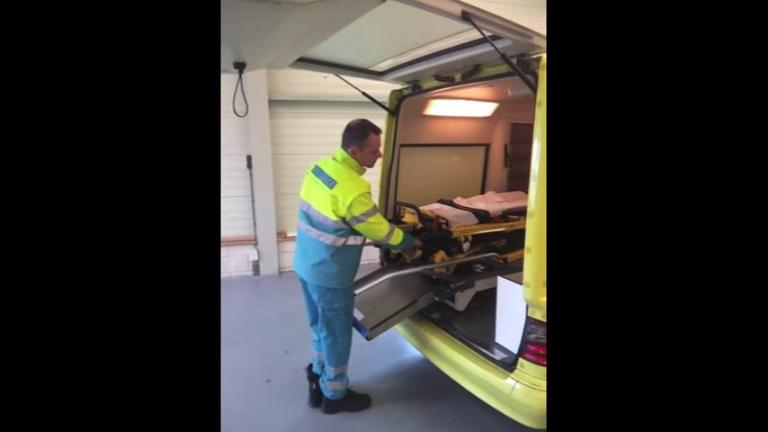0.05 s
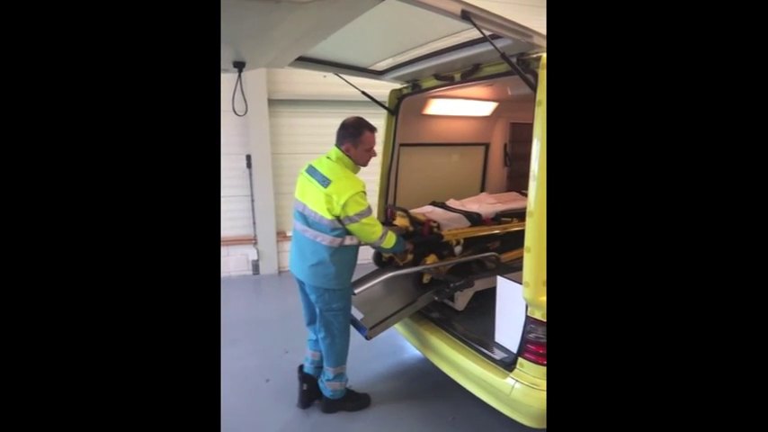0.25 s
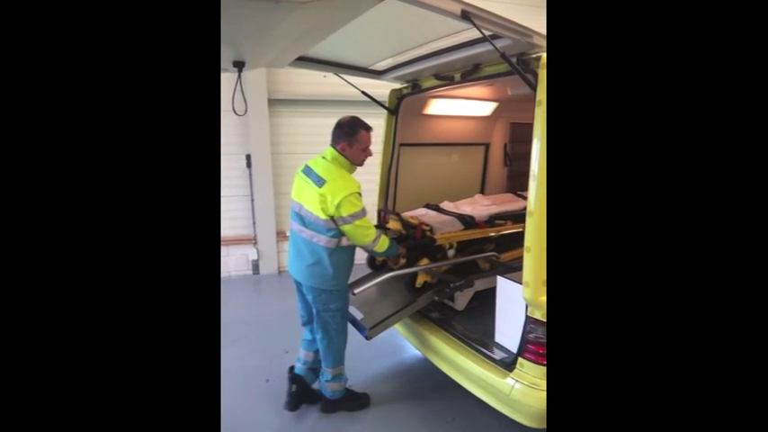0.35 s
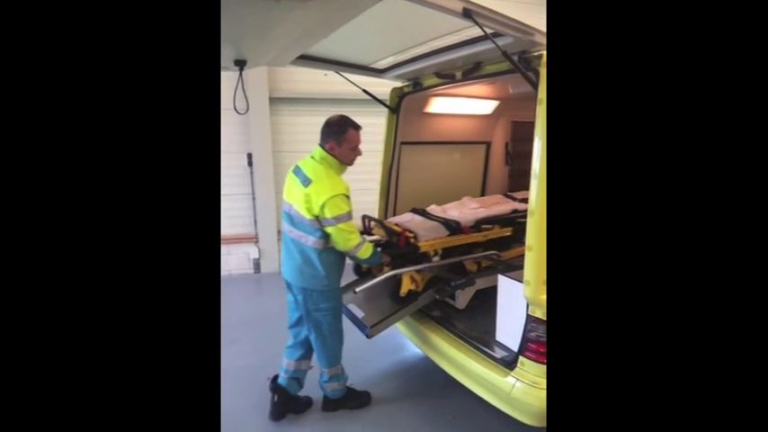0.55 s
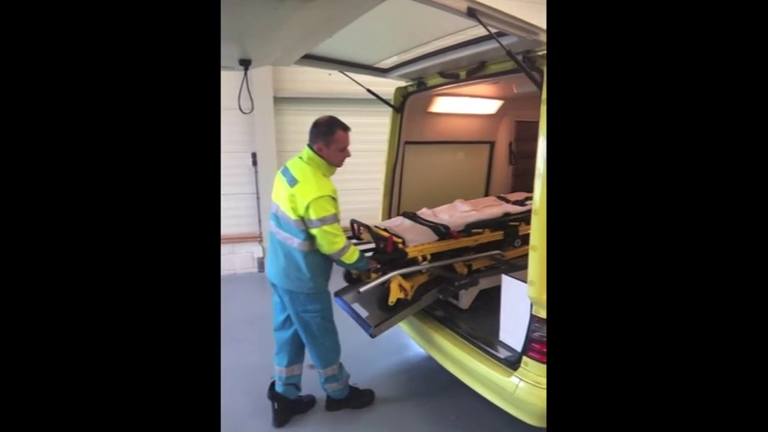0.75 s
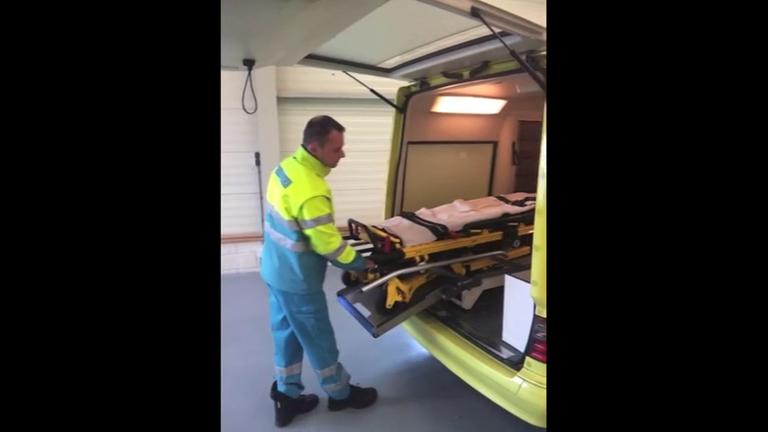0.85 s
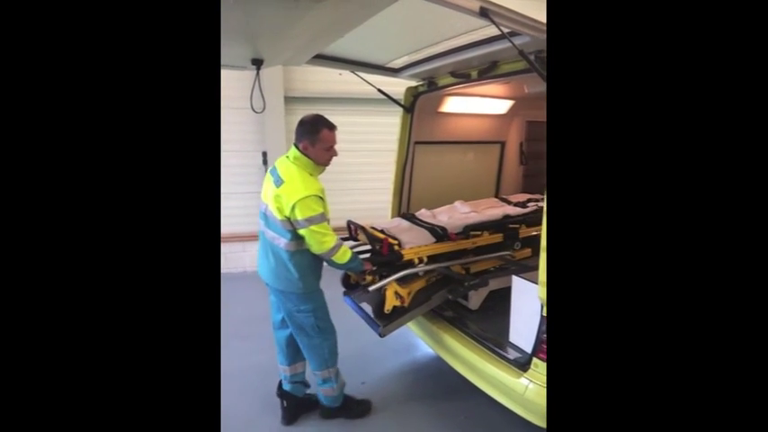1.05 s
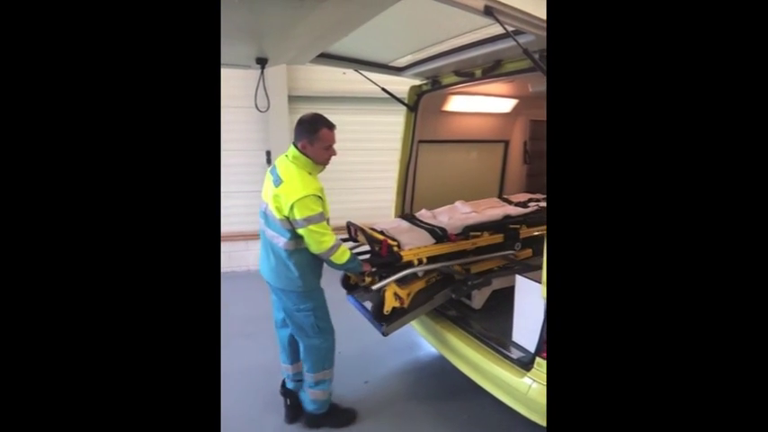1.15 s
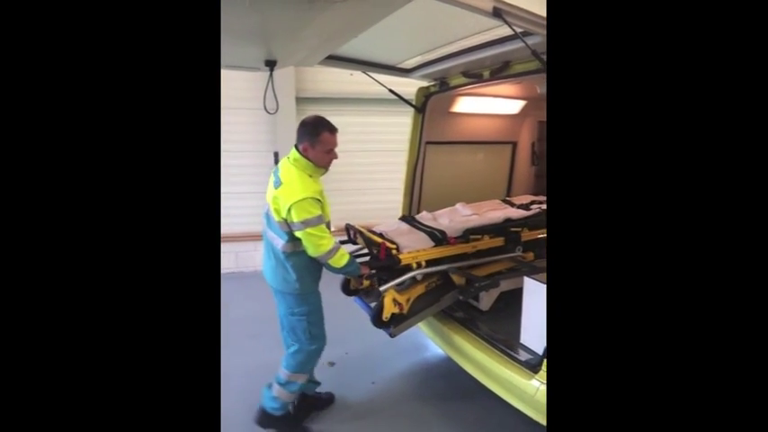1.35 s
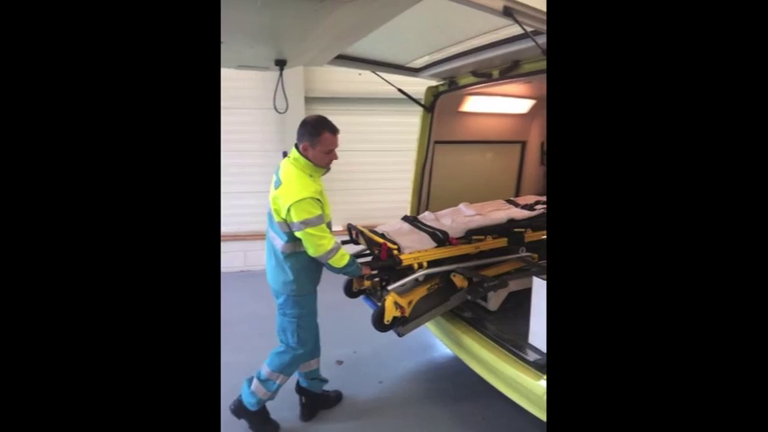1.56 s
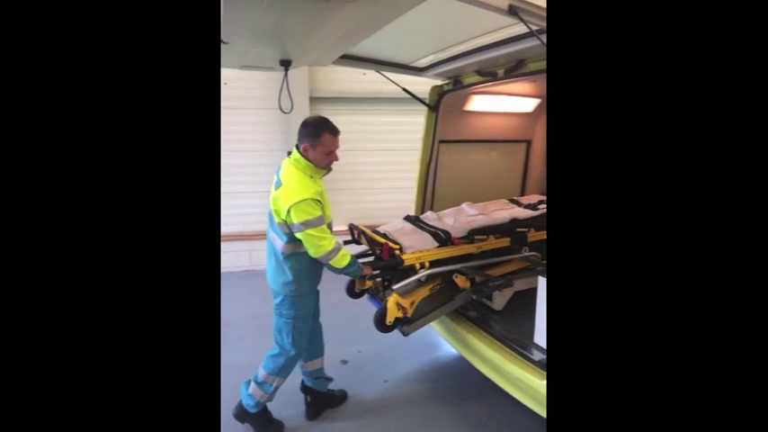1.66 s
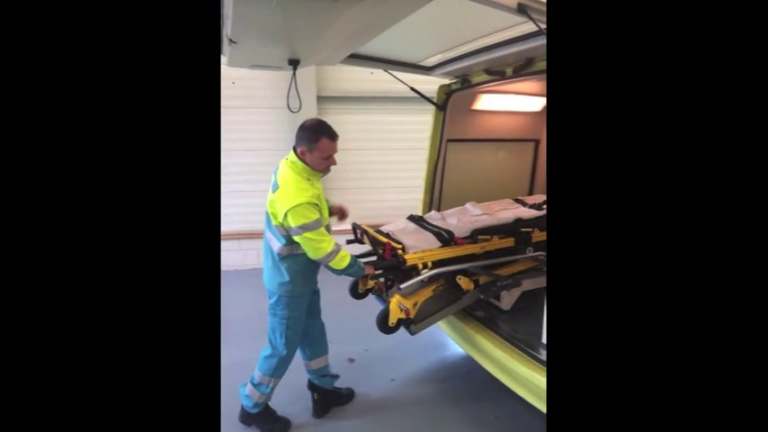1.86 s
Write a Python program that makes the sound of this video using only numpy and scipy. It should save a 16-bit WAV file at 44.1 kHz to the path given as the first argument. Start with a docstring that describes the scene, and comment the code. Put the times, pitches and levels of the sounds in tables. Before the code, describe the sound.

A wheeled metal stretcher is drawn out of a van in an echoing garage. Soft dull knocks at 0.1-0.3 s lead to a bright latch clack near 0.4 and a thud at 0.5. The heaviest clatter lands around 0.65-0.9 over uneven roller rumble. Lighter clanks cluster at 1.0-1.3, then faint ticks at 1.6 and 1.9 over reverberation and quiet air; treble is dulled.

```python
"""A wheeled stretcher is unlatched and drawn out of a van in a hard-walled garage.
Clacks are short bursts of metal chatter that shake latch, legs, frame, tray, ramp and van floor.
Rollers rumble on the rails as dense, uneven contacts, and single clean blows ring a few modes each.
The garage answers with a long diffuse tail, over a steady bed of background air."""
import sys
import numpy as np
from scipy import signal
from scipy.fft import rfft, irfft
from scipy.io import wavfile

SR = 44100
rng = np.random.default_rng(int(sys.argv[2]) if len(sys.argv) > 2 else 0)


def inscribe(sig):
    """Save sig as 16-bit PCM at rate SR to the path in sys.argv[1].

    A 1-D sig is mono; a 2-D sig holds one channel per row.
    Samples are clipped to [-1, 1] before scaling.
    """
    pcm = np.round(np.clip(np.atleast_2d(sig).T, -1, 1) * 32767)
    wavfile.write(sys.argv[1], SR, pcm.astype(np.int16))


N = 83790  # length [samples]


def amp(db):
    """Turn decibels into a linear gain."""
    return 10 ** (np.asarray(db, float) / 20)


def unit(x):
    """Scale a sound to energy 1."""
    return x / np.sqrt(np.sum(x ** 2))


def band(x, lo_hz, hi_hz):
    """Band-pass a sound, keeping the upper edge clear of the sampling limit."""
    edges = [lo_hz, min(hi_hz, .45 * SR)]
    return signal.sosfilt(signal.butter(2, edges, "bandpass", fs=SR, output="sos"), x)


def fade(t, t60):
    """Exponential decay that falls 60 dB in t60 seconds."""
    return np.exp(-np.log(1000) * t / t60)


def random_signs():
    """A random polarity for every sample."""
    return rng.choice([-1., 1.], size=N)


# Background air spectrum: (frequency [Hz], relative level [dB])
AIR_SPECTRUM = [(15, -42), (25, 4), (119, -11.5), (185, -23), (260, 11), (444, -15), (3700, -6.5),
                (7000, -22), (9100, -77), (15400, -120)]
AIR_DB = -54  # rms level of the whole bed


def air():
    """Steady background noise of the hall: white noise shaped by a smooth spectrum."""
    f = np.fft.rfftfreq(N, 1 / SR) + 1  # 1 Hz up, so the logarithm stays finite
    hz, db = np.array(AIR_SPECTRUM).T
    gain = amp(np.interp(np.log(f), np.log(hz), db))
    noise = irfft(rfft(rng.standard_normal(N)) * gain, N)
    return amp(AIR_DB) * noise / noise.std()


# Rollers on the rails: (time [s], metalwork level [dB], ramp level [dB], van floor level [dB])
ROLLING = [(0, -52.5, -57, -54), (.1, -49, -59, -47.5), (.25, -44.5, -52.5, -55.5), (.36, -43, -65, -48),
           (.55, -39, -41, -46.5), (.65, -37, -58, -44), (0.802, -36.5, -43.5, -39), (.95, -40, -47.5, -39),
           (1.1, -43, -55, -47), (1.152, -43.5, -53.5, -60), (1.351, -51.5, -52, -44),
           (1.5, -47, -46.5, -51.5), (1.581, -44.5, -62, -59), (1.701, -49.5, -52, -49),
           (1.9, -57, -90, -63.5)]
# Share of the metalwork level in latch, legs, frame, tray: (level [dB])
METAL_SHARES = [-17.5, -14.5, -8.5, -5]


def roller_forces():
    """Rolling swells and sinks smoothly in decibels; one force curve per part."""
    t = np.arange(N) / SR
    times, *levels = np.array(ROLLING).T
    metal, ramp, van = (amp(np.interp(t, times, db)) for db in levels)
    return [amp(db) * metal for db in METAL_SHARES] + [ramp, van]


def contacts(per_s, scatter_db):
    """Random contacts of uneven size and either sign, rms 1."""
    chance, size = rng.random((2, N))
    hits = np.clip((per_s / SR - chance) * 1e6, 0, 1) * random_signs()
    hits = hits * amp(scatter_db * np.minimum(-np.log(1 - size), 3))  # mostly small, a few large
    return hits / hits.std()


CHATTER_PER_S, CHATTER_SCATTER_DB = 3000, 3.
ROLL_PER_S, ROLL_SCATTER_DB = 1500, 5.5


def part(chatter_force, roll_force, modes, dense):
    """Contacts ring each mode of a part and its wide band; they land on ever different spots."""
    t = np.arange(SR // 3) / SR
    lo_hz, hi_hz, dense_db = dense
    rings = []
    for hz, db, t60 in modes:
        tone = unit(np.sin(2 * np.pi * hz * t) * fade(t, t60))
        rings.append(tone * amp(db - dense_db) / 2)
    rings.append(unit(band(1. * (t == 0), lo_hz, hi_hz)))
    drive = chatter_force * contacts(CHATTER_PER_S, CHATTER_SCATTER_DB)
    drive = drive + roll_force * contacts(ROLL_PER_S, ROLL_SCATTER_DB)
    # fresh signs per ring: each spot pushes every mode a different way
    return sum(signal.fftconvolve(drive * random_signs(), ring)[:N] for ring in rings)


# Ringing modes of each part: (frequency [Hz], relative level [dB], t60 [s])
LATCH_MODES = [(2650, -8, .06), (3390, -3, .07), (3480, -6, .05), (3700, -6, .04), (4150, -6, .05),
               (4700, -9, .04), (5900, -11, .05)]
LEG_MODES = [(2660, -6, .07), (3170, -10, .07), (3870, -6, .05), (3960, -3, .06), (4270, -8, .06),
             (4530, -8, .07), (5080, -6, .07), (5650, -12, .05)]
FRAME_MODES = [(908, -1.5, 0.093), (973, -4.5, 0.058), (1030, -5, 0.12), (1193, 0.5, .1), (1240, 5, 0.022),
               (1420, 2, 0.025), (1598, -1, 0.028), (1886, -12.5, 0.026), (2400, -0.5, 0.027)]
TRAY_MODES = [(440, -1.5, 0.13), (500, 2.5, 0.089), (545, -2, 0.1), (599, 0, 0.059), (740, -30, 0.03)]
RAMP_MODES = [(225, -5, .15), (257, 1, .23), (300, -7, .12)]
VAN_MODES = [(48.5, -1.5, 0.16), (67, -24.5, 0.11), (119.3, -9.5, 0.2), (130, -3, 0.14), (155, -15, 0.15),
             (195, -7.5, 0.055)]
PARTS = [LATCH_MODES, LEG_MODES, FRAME_MODES, TRAY_MODES, RAMP_MODES, VAN_MODES]
# The many unresolved modes of each part as one wide band, in the order of PARTS:
# (low edge [Hz], high edge [Hz], weight against the single modes [dB])
DENSE_BANDS = [(3630, 6830, 5.5), (2190, 5800, 6), (600, 2620, 9.5), (330, 924, 2), (187, 312, -1.5),
               (70.4, 216, -1)]


def stretcher():
    """Bursts of chatter and rolling contacts excite all parts."""
    return sum(map(part, clack_forces(), roller_forces(), PARTS, DENSE_BANDS))


# Garage echo by octave: (band centre [Hz], t60 [s], level [dB])
GARAGE_BANDS = [(57.7, 1.1, -29), (134, 1.7, -6.5), (282, 0.57, -9.5), (500, 0.69, -2.5),
                (1090, 1.03, -0.5), (1925, 1.74, -3), (3860, 1.56, -6), (6850, 1.4, -11.5)]
GARAGE_ONSET_S = 0.093


def garage(x):
    """Diffuse echo that builds up, then fades octave by octave."""
    t = np.arange(N) / SR
    tail = np.zeros(N)
    for hz, t60, db in GARAGE_BANDS:
        octave = band(rng.standard_normal(N), hz / np.sqrt(2), hz * np.sqrt(2))
        width_gain = np.sqrt(hz / SR * np.sqrt(2))  # wider octaves carry more energy
        tail += amp(db) * width_gain * unit(octave * fade(t, t60))
    return signal.fftconvolve(x, tail * np.clip(t / GARAGE_ONSET_S, 0, 1))[:N]


# Single clean blows, each ringing the modes near one pitch:
# (time [s], favoured pitch [Hz], level [dB], contact length [cycles of that pitch])
BLOWS = [(0.134, 2400, -49.5, 2.5), (0.08, 257, -36, 3.6), (0.185, 1420, -34, 3.), (0.196, 257, -25.5, 7.4),
         (0.228, 256, -31.5, 4.9), (.075, 500, -39, 2.5), (.195, 545, -36.5, 2), (0.246, 440, -30.5, 2.8),
         (0.277, 3760, -38.5, 5), (0.28, 4550, -45, 4.8), (0.292, 130, -28, 1.4), (0.292, 3960, -42, 6.4),
         (.377, 3370, -21, 4.4), (.39, 3440, -27.5, 8), (0.385, 5900, -20.5, 9.2), (.408, 3520, -31, 5.3),
         (0.41, 4070, -31, 5.8), (0.42, 3710, -23.5, 5.8), (0.424, 500, -24, 5.6),
         (0.486, 195, -19.5, 0.69), (0.523, 2660, -36, 7), (0.672, 4540, -22, 3.1), (0.675, 195, -20, 1.4),
         (.678, 155, -19.5, 0.77), (.684, 225, -25, 1.3), (0.681, 1590, -23, 4), (0.684, 1240, -17, 4.9),
         (.692, 1886, -28, 4), (.687, 973, -23, 2), (0.704, 67, -31, .8), (.704, 1030, -23, 2),
         (0.713, 195, -31, 0.76), (.733, 1598, -33, 3), (.738, 225, -30, 1.6), (0.754, 908, -31, 2.5),
         (.79, 225, -25.5, 1.6), (.87, 500, -28, 3), (1.024, 3384, -37.5, 10.2), (1.029, 4360, -32.5, 3.8),
         (1.167, 547, -29, 2.9), (1.17, 4030, -31.5, 4.8), (1.196, 3960, -27.5, 8),
         (1.197, 5070, -28.5, 8.), (1.205, 973, -28.5, 2.3), (1.221, 973, -37, 1.6), (1.22, 545, -33.5, 2),
         (1.222, 3960, -35, 11), (1.24, 3960, -38, 8), (1.228, 5480, -23, 7.1), (1.236, 5080, -32.5, 7.4),
         (1.25, 121, -28, 1), (1.281, 130, -28.5, 0.54), (1.331, 120.4, -38, 1), (1.52, 130, -37, 1),
         (1.602, 1886, -44, 3.1), (1.604, 740, -40, 1.8), (1.607, 1030, -44.5, 1.2),
         (1.608, 1420, -38, 3.3), (1.617, 546, -39, 1.8), (1.62, 155, -36, 1), (1.671, 195, -31.5, 0.72)]
SPOT_OCTAVES = 0.056  # how far from its pitch a blow reaches


def knocks():
    """Each blow swells over its contact and rings out in the nearest modes."""
    hz, _, t60 = np.array(sum(PARTS, [])).T[:, :, None]
    out, t = np.zeros(N + SR), np.arange(SR // 2) / SR
    phases = rng.random((len(BLOWS), len(hz), 1))  # in turns
    for (start_s, pitch, db, cycles), phase in zip(BLOWS, phases):
        share = np.exp(-(np.log2(hz / pitch) / SPOT_OCTAVES) ** 2)
        tones = np.sin(2 * np.pi * (hz * t + phase))
        ring = np.sum(share * tones * fade(t, t60), axis=0)
        swell = np.clip(t * pitch / cycles, 0, 1)
        start = int(start_s * SR)
        out[start:start + len(t)] += amp(db) * ring * swell
    return out[:N]


# Clacks: (time [s], rise [s], chatter [s], first blow over chatter [dB], latch level [dB],
# legs level [dB], frame level [dB], tray level [dB], ramp level [dB], van floor level [dB])
CLACK_BURSTS = [(.132, 0.006, 0.026, -1, -70, -82, -51.5, -57, -46.5, -61),
                (0.186, 0.004, 0.07, -11.5, -78, -80.5, -52, -49.5, -42.5, -51.5),
                (0.276, 0.0033, 0.016, -13.5, -62.5, -49.5, -46.5, -48, -46.5, -63.5),
                (0.379, 0.0012, 0.05, 2.5, -30, -32, -34.5, -39, -37.5, -38.5),
                (0.444, .004, 0.047, 0.5, -42.5, -38, -48, -45.5, -48, -53),
                (0.497, 0.0092, 0.05, 6, -55, -42, -39.5, -47, -41.5, -39.5),
                (0.655, 0.0095, 0.045, -6.5, -27.5, -26.5, -26, -35, -33.5, -38),
                (0.679, 0.033, 0.049, -11, -33, -32.5, -27, -43.5, -45, -32.5),
                (0.733, 0.0022, 0.048, -3, -38, -34.5, -34, -40.5, -40.5, -41),
                (0.792, 0.0038, 0.069, 2.5, -41, -41.5, -35, -35, -47, -38.5),
                (0.883, .004, 0.031, 9, -40, -39, -37, -39.5, -49, -43),
                (1.021, 0.0021, 0.014, -6, -53, -42, -37.5, -58, -42.5, -43.5),
                (1.16, 0.0017, 0.024, 0, -58.5, -35, -39.5, -41.5, -49, -45),
                (1.193, 0.0026, 0.023, -12, -38.5, -40.5, -34.5, -40, -42, -38),
                (1.219, 0.006, 0.027, -3, -37, -46, -37.5, -44.5, -54, -41),
                (1.251, 0.0027, 0.026, -1, -47, -52, -43, -55, -54, -49.5),
                (1.279, 0.0035, 0.051, 7, -49, -49, -50.5, -53, -50, -51),
                (1.384, 0.0047, 0.019, 4, -50.5, -51, -49, -51, -46.5, -57),
                (1.599, 0.0034, 0.016, -1.5, -54, -52.5, -49, -46, -52.5, -44),
                (1.871, 0.0039, 0.012, -7, -50.5, -53, -60, -72, -73, -49)]
DROP_S = 0.0079  # chatter dies with this time constant
BLOW_S = 0.001  # the first contacts of a clack get an extra push for about this long


def clack_forces():
    """Each clack is a first blow plus chatter that rises, holds and dies; one force per part."""
    t = np.arange(N) / SR
    pushes = []
    for start, rise, hold, blow_db, *_ in CLACK_BURSTS:
        attack = np.clip((t - start) / rise, 0, 1)
        decay = np.exp(-np.maximum(t - start - hold, 0) / DROP_S)
        blow = amp(blow_db) * np.exp(-((t - start - BLOW_S) / BLOW_S) ** 2)
        pushes.append(attack * decay + blow)
    part_gains = amp(np.array(CLACK_BURSTS)[:, 4:]).T
    return part_gains @ np.array(pushes)


def scene():
    """Mix the stretcher and its knocks with the garage echo and the air, in mono."""
    near = stretcher() + knocks()
    return (near + garage(near) + air())[None]


MIC_HZ, TOP_HZ = 6180, 7030  # roll-off and steep cut


def record(dry):
    """The microphone rolls off, then a steep cut."""
    soft = signal.sosfilt(signal.butter(12, MIC_HZ, fs=SR, output="sos"), dry)
    return signal.sosfilt(signal.ellip(14, .5, 45, TOP_HZ, fs=SR, output="sos"), soft)


dry = scene()
out = record(dry)
inscribe(out)
```